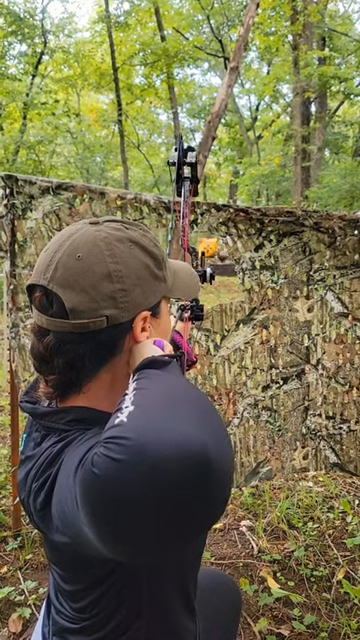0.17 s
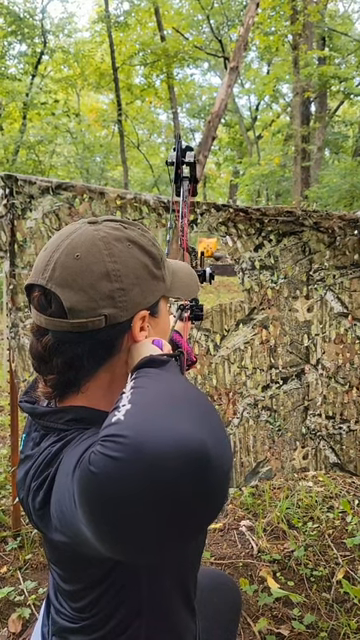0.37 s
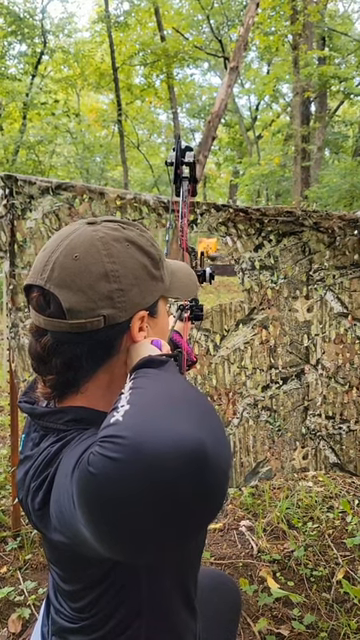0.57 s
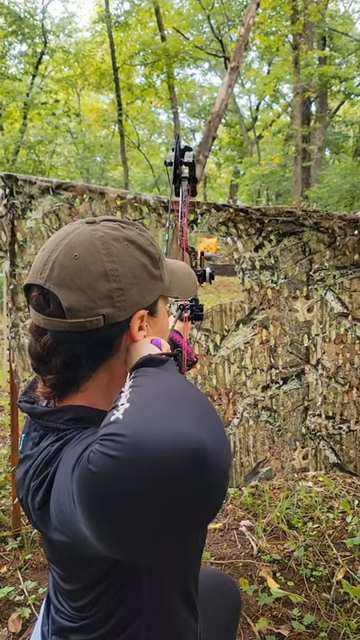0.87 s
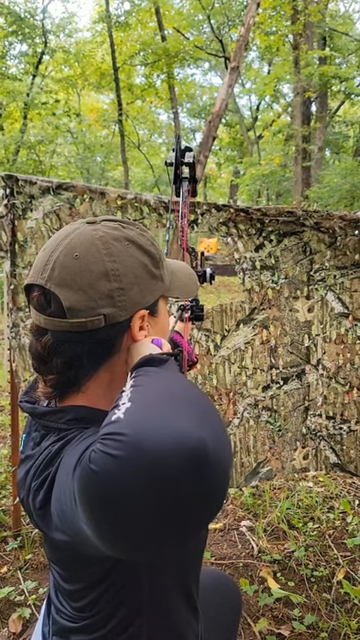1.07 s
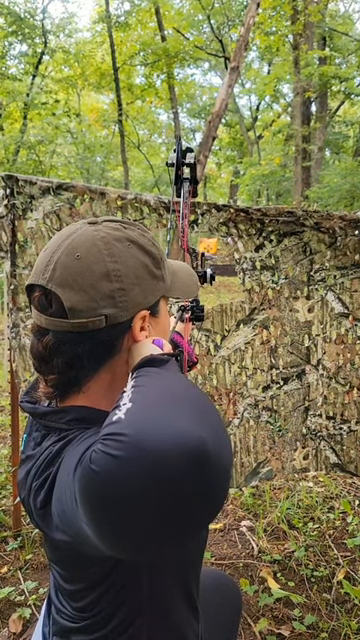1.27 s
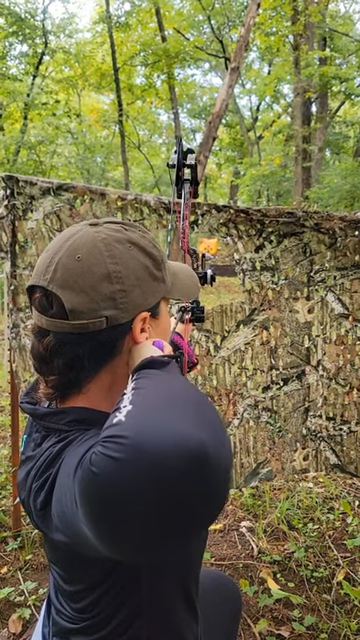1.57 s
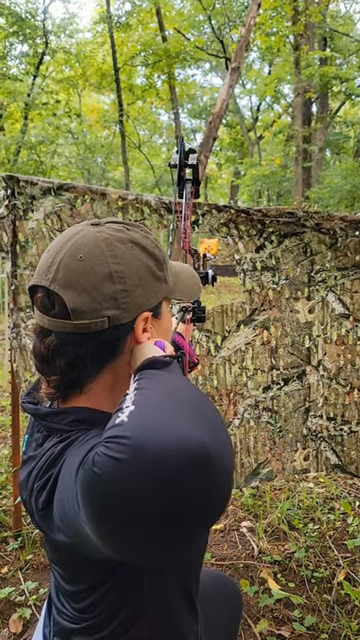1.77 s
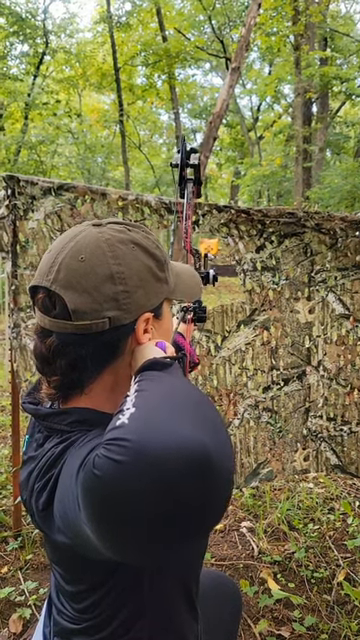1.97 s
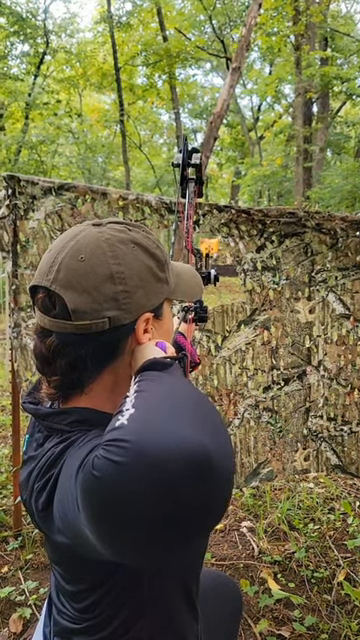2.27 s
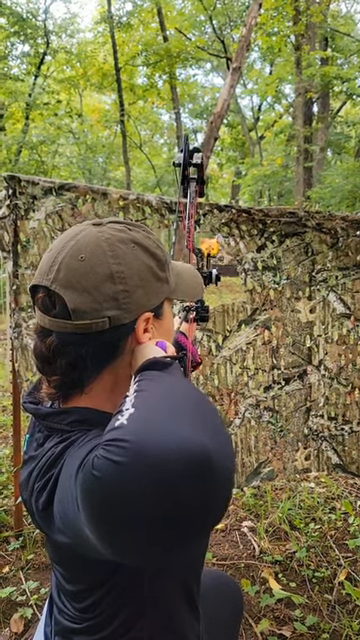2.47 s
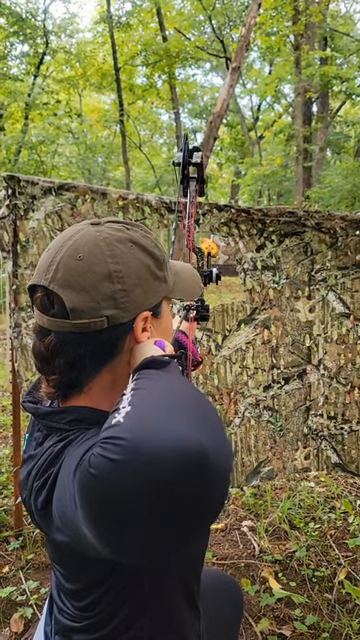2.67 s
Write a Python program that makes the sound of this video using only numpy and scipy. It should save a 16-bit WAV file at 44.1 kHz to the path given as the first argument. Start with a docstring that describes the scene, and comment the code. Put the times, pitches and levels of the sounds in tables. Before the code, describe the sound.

Crickets trill continuously for about three seconds, a dense, high, shimmering band with a nearer one pulsing very fast on the right. Beneath lie faint distant traffic, wavering low hum and light hiss. Soft road swells and hoarse far animal calls come mostly before 0.7 s, with another near 1.2. A small bird chirps faintly at 0.4, 1.8 and 2.7; twigs tick dully at 2.2 and 2.6. Soft woodland echo.

```python
"""Crickets in quiet woods

A dense chorus of crickets, modelled as patchy noise, trills around 6 kHz; nearer ones, built as trains
of gliding tones, pulse mostly on the right. Under them lie filtered-noise traffic, wavering hums and hiss.
A small bird whistles three times, animals call far off as narrow noise bands, and twigs tick twice.
Convolution with decaying random echoes gives the calls, tyre swells and separate crickets a soft tail."""
import sys
import numpy as np
from scipy import signal
from scipy.fft import rfft, irfft
from scipy.io import wavfile
from scipy.ndimage import uniform_filter1d

SR = 44100
rng = np.random.default_rng(int(sys.argv[2]) if len(sys.argv) > 2 else 0)


def master(y):
    """Save y as 16-bit WAV."""
    cut = np.clip(np.atleast_2d(y).T, -1, 1)
    pcm = np.round(cut * 32767)  # scale
    wavfile.write(sys.argv[1], SR, pcm.astype(np.int16))


N = 124803
TIME = np.arange(N) / SR  # s


def amp(db):
    """Level to amplitude: 20 dB is a factor of ten."""
    return 10 ** (np.asarray(db) / 20)


def unit(x):
    """Normalization to a root-mean-square value of 1."""
    return x / np.sqrt(np.mean(x ** 2) + 1e-20)


def pan(db):
    """Interaural level difference: gains of mean power 1, positive to the left."""
    return unit(amp([[db / 2], [-db / 2]]))


def read(points, hz):
    """Interpolation along a logarithmic frequency axis."""
    f, value = np.transpose(points)
    return np.interp(np.log(hz + 1), np.log(np.sort(f) + 1), value)


def add(mix, s, sound):
    """Superposition: the sound is summed in from time s."""
    part = mix[..., max(round(s * SR), 0):][..., :sound.shape[-1]]
    part += sound[..., :part.shape[-1]]


def progress(length):
    """Normalized time, from 0 to 1 over an event of the given length in seconds."""
    return np.arange(0, length, 1 / SR) / length


def band(hz, width_hz, size=N):
    """Gaussian band-pass filtering of white noise; around 0 Hz it gives a slow random drift."""
    f = np.fft.rfftfreq(N, 1 / SR)
    spectrum = rfft(rng.standard_normal(N)) * np.exp(-((f - hz) / width_hz) ** 2)
    return unit(irfft(spectrum, N)[:size])


def wash(spectrum, patchy_db, likeness=None, closed=False):
    """Spectral shaping of stereo noise, with level patches in time and frequency and set coherence."""
    frames, hz = N // 256 + 6, np.fft.rfftfreq(2048, 1 / SR)
    a, b, c, d, patches = rng.standard_normal((5, frames, len(hz)))
    patches = uniform_filter1d(patches, size=14, axis=0)
    patches = unit(uniform_filter1d(patches, size=18, axis=1))
    same = np.clip(read(likeness, hz), -1, 1) if likeness else 0
    left = a + 1j * b
    right = same * left + np.sqrt(1 - same ** 2) * (c + 1j * d)
    z = np.array([left, right]) * amp(read(spectrum, hz) + patchy_db * patches)
    if closed:  # nothing outside the tabulated band
        z *= (hz > spectrum[0][0]) & (hz < spectrum[-1][0])
    sound = signal.istft(z.swapaxes(1, 2), nperseg=2048, noverlap=1792)[1]
    return unit(sound[:, 512:512 + N])


WOODS_T60_S, WOODS_BUILD_S = 0.64, 0.004  # 60 dB decay time, build-up time constant


def woods(x, t60_s):
    """Multiple scattering: sparse echoes from trunks and leaves decay, independently at each ear."""
    t = TIME[:SR]
    taps = rng.standard_normal((2, SR)) * (rng.random((2, SR)) < .1)
    tail = taps * (1 - np.exp(-t / WOODS_BUILD_S)) * amp(-60 * t / t60_s)
    wet = signal.fftconvolve(x[None], tail, axes=1)
    return wet * np.linalg.norm(x) / np.linalg.norm(wet, axis=1, keepdims=True)


# microphone hiss spectrum: (frequency [Hz], relative density [dB per Hz])
HISS_SPECTRUM = [(2000, -9.5), (4000, -9), (7600, -4), (9000, 2), (11000, -0.5), (13500, 0), (16000, 3)]
HISS_DB, HISS_PAN_DB = -71.5, 6.5


def hiss():
    """Stationary random noise: the microphone's hiss, independent in the two channels."""
    return amp(HISS_DB) * pan(HISS_PAN_DB) * wash(HISS_SPECTRUM, 0)


# far machinery: (frequency [Hz], level [dB])
HUM_TONES = [(62.5, -72.5), (110, -82.5), (520, -72.5)]
HUM_WANDER_HZ, HUM_PAN_DB = 2.16, -4.5


def hums():
    """Frequency and amplitude modulation: slow random drifts waver each machine's tone."""
    total = 0
    for hz, db in HUM_TONES:
        pitch = hz + HUM_WANDER_HZ * band(0, 6.4)
        tone = np.sin(2 * np.pi * np.cumsum(pitch) / SR)
        total = total + amp(db) * unit(tone * (1 + 0.8 * band(0, 4.7)))
    return pan(HUM_PAN_DB) * total


# far traffic and air: (frequency [Hz], relative density [dB per Hz])
TRAFFIC_SPECTRUM = [(25, -33), (38, -8), (60, -1.5), (105, -2), (165, -15.5), (240, -6.5), (320, -10),
                    (480, -3.5), (620, -3.5), (790, 1.5), (900, -3.5), (1120, -4), (1500, -13), (2000, -24),
                    (2700, -35), (4000, -36.5), (6000, -60)]
# similarity of the two channels: (frequency [Hz], left-right coherence [0 to 1])
TRAFFIC_COHERENCE = [(60, 0.94), (160, .8), (450, 0.49), (740, 0.27), (1220, 0.21), (2000, 0)]
TRAFFIC_DB, TRAFFIC_PAN_DB, TRAFFIC_PATCHY_DB = -57.5, -2, 1


def traffic():
    """Partial coherence: the traffic wash is most alike at the two ears at low frequencies."""
    sound = wash(TRAFFIC_SPECTRUM, TRAFFIC_PATCHY_DB, TRAFFIC_COHERENCE)
    return amp(TRAFFIC_DB) * pan(TRAFFIC_PAN_DB) * sound


# tyre noise on the far road: (time [s], length [s], first frequency [Hz], last frequency [Hz],
# width [Hz], level [dB])
TYRE_SWELLS = [(.14, .52, 940.4, 1061, 260, -59), (.5, .85, 1175, 1606, 128, -72.5),
               (2.35, .32, 730, 850, 140, -60.5)]


def tyres(length, first_hz, last_hz, width_hz, db):
    """Noise modulation of a gliding carrier: a band of road noise swells, climbs and fades."""
    u = progress(length)
    carrier = np.cos(2 * np.pi * np.cumsum(first_hz + (last_hz - first_hz) * u) / SR)
    sound = unit(np.sin(np.pi * u) * carrier * band(0, width_hz, size=len(u)))
    return amp(db) * pan(TRAFFIC_PAN_DB) * woods(sound, WOODS_T60_S)


# hoarse animals: (time [s], length [s], pitch [Hz], width [Hz], level [dB], left-right difference [dB])
DISTANT_CALLS = [(0.5, 0.034, 3470, 120, -83, 0), (.12, 0.088, 3180, 200, -88, 5),
                 (0.35, 0.083, 930, 120, -56, -6), (0.3, 0.16, 1655, 130, -72, -4),
                 (.38, .28, 780, 40, -60, -17), (1.2, 0.11, 1900, 340, -66, -1),
                 (1.22, 0.13, 1870, 350, -72.5, -1), (1.6, 0.17, 2040, 480, -74.5, -1),
                 (2.62, 0.079, 2860, 770, -75, 2)]


def far_call(length, hz, width_hz, db, pan_db):
    """Resonance and scattering: only a hoarse call's strongest resonance and its echoes arrive."""
    u = progress(length)
    call = unit(np.sqrt(np.sin(np.pi * u)) * band(hz, width_hz, size=len(u)))
    return amp(db) * pan(pan_db) * woods(call, WOODS_T60_S)


# twigs: (time [s], frequency [Hz], noise level before the envelope [dB])
TWIG_TICKS = [(2.238, 1760, -70), (2.635, 2700, -77)]
TICK_WIDTH_HZ, TICK_DECAY_S = 440, 0.0086  # the envelope peaks at half TICK_DECAY_S


def tick(hz, db):
    """Damped impulse response: a twig's short, dull tick is narrow noise that rises and dies away."""
    t = TIME[:SR // 10]
    envelope = t / TICK_DECAY_S * np.exp(2 - 2 * t / TICK_DECAY_S)
    return amp(db) * unit(band(hz, TICK_WIDTH_HZ, size=len(t))) * envelope


# bird: (time [s], length [s], middle pitch [Hz], level of the echoes [dB], left-right difference [dB])
BIRD_CHIRPS = [(0.426, .08, 3390, -71, 5.5), (1.756, 0.067, 3396, -68.5, 0.5),
               (2.707, 0.0716, 3380, -70, 4)]
CHIRP_RISE_HZ, CHIRP_ROUGH_HZ = 200, 95
CHIRP_DIRECT_DB, CHIRP_T60_S = -8.5, 0.56  # direct sound relative to the note that feeds the echoes


def chirp(length, hz, db, pan_db):
    """Frequency modulation: a rising, slightly rough whistle, heard mostly through its echoes."""
    u = progress(length)
    pitch = hz + CHIRP_RISE_HZ * (u - .5) + CHIRP_ROUGH_HZ * band(0, 270, size=len(u))
    note = unit(np.sin(np.pi * u ** 1.53) * np.sin(2 * np.pi * np.cumsum(pitch) / SR))
    sound = woods(note, CHIRP_T60_S)
    add(sound, 0, amp(CHIRP_DIRECT_DB) * note)
    return amp(db) * pan(pan_db) * sound


# far crickets blended into one band: (frequency [Hz], relative density [dB per Hz])
CHORUS_SPECTRUM = [(4250, -53), (4530, -38), (4720, -46.5), (4930, -36), (5200, -21.5), (5500, -18.5),
                   (5800, -5.5), (6020, -2), (6170, -3.5), (6450, -9.5), (6800, -19), (6980, -25.5),
                   (7200, -30.5), (7400, -42), (7900, -44.5), (8300, -56)]
# the chorus an octave up: (frequency [Hz], relative density [dB per Hz])
OVERTONE_SPECTRUM = [(10200, -19), (11100, -12), (11700, -1), (12000, 1), (12400, -6), (13000, -6.5),
                     (13800, -21)]
CHORUS_DB, CHORUS_PAN_DB, CHORUS_PATCHY_DB = -46.5, -5.8, 0.82
OVERTONE_DB, OVERTONE_PAN_DB = -71.5, -2.5


def chorus():
    """Incoherent summation: countless far crickets merge into a noise band and its weak octave."""
    song = wash(CHORUS_SPECTRUM, CHORUS_PATCHY_DB, closed=True)
    octave = wash(OVERTONE_SPECTRUM, CHORUS_PATCHY_DB, closed=True)
    return amp(CHORUS_DB) * pan(CHORUS_PAN_DB) * song + amp(OVERTONE_DB) * pan(OVERTONE_PAN_DB) * octave


PITCH_WANDER, CRICKET_OCTAVE_DB = 0.00305, -31.5  # fraction of pitch, octave relative to fundamental


def trill(strokes, pitch, envelope, spread_db, echo_db):
    """Pulse-train modulation: wing strokes of random strength and phase, with their echoes."""
    size, start = rng.standard_normal((256, 2))[strokes.astype(int)].T
    wandering = pitch * (1 + PITCH_WANDER * band(0, 18.98))
    phase = 2 * np.pi * (np.cumsum(wandering) / SR + start)
    tone = np.sin(phase) + amp(CRICKET_OCTAVE_DB) * np.sin(2 * phase)
    song = unit(envelope * amp(spread_db * size) * tone)
    # a second of song beforehand lets the echoes already be ringing at the start
    echo = woods(np.concatenate([song[-SR:], song]), WOODS_T60_S)[:, SR:SR + N]
    return unit(song + amp(echo_db) * echo)


# crickets further off: (stroke rate [per s], pitch [Hz], fall within a stroke [Hz], stroke length [s],
# level [dB], left-right difference [dB], echo relative to direct song [dB])
FURTHER_CRICKETS = [(36.6, 6810, 210, 0.012, -67, -5.5, 6), (36.66, 7170, 180, .013, -76.5, -14, 8.5),
                    (31.56, 6050, 250, .009, -56.5, -8.5, 2.5), (33.66, 5520, 550, .012, -63.5, 6, 1)]
STROKE_SPREAD_DB, RATE_WANDER = 3.8, .008  # RATE_WANDER is a fraction of the rate


def cricket(rate, hz, fall_hz, stroke_s, db, pan_db, echo_db):
    """Stridulation: each wing stroke is a short tone that sags in pitch as the wing slows."""
    strokes = np.cumsum(rate * (1 + RATE_WANDER * band(0, 2))) / SR + rng.random()
    u = np.minimum(strokes % 1 / rate / stroke_s, 1)  # silent once it reaches 1
    song = trill(strokes, hz - fall_hz * u ** 4, np.sin(np.pi * u), STROKE_SPREAD_DB, echo_db)
    return amp(db) * pan(pan_db) * song


# one stroke, two pushes and a falling tail: (time [s], pitch [Hz], relative level [dB])
NEAR_STROKE = [(0, 5860, -36), (.003, 5770, -6), (.0055, 5745, -7), (.007, 5745, -8), (.0095, 5750, -1),
               (.0118, 5700, 0), (.014, 5580, -10), (.016, 5190, -22), (.019, 4920, -27), (.022, 4820, -50)]
NEAR_STROKES_PER_S, NEAR_FIRST_S = 33.73, -.0072
NEAR_DB, NEAR_SPREAD_DB = -52.9, 1.7
NEAR_PAN_DB, NEAR_ECHO_DB = -17, -10


def near_cricket():
    """Periodic stridulation: the nearest cricket repeats its stroke at a strictly constant rate."""
    strokes = (TIME - NEAR_FIRST_S) * NEAR_STROKES_PER_S
    age = strokes % 1 / NEAR_STROKES_PER_S
    s, hz, db = np.transpose(NEAR_STROKE)
    pitch, envelope = np.interp(age, s, hz), amp(np.interp(age, s, db))
    song = trill(strokes, pitch, envelope, NEAR_SPREAD_DB, NEAR_ECHO_DB)
    return amp(NEAR_DB) * pan(NEAR_PAN_DB) * song


def scene():
    """Linear superposition: continuous sources throughout, with timed events on top."""
    mix = hiss() + hums() + traffic() + chorus()
    for row in FURTHER_CRICKETS:
        mix += cricket(*row)
    mix += near_cricket()
    events = ((tyres, TYRE_SWELLS), (far_call, DISTANT_CALLS), (tick, TWIG_TICKS), (chirp, BIRD_CHIRPS))
    for source, table in events:
        for s, *row in table:
            add(mix, s, source(*row))
    return mix


EDGE_HZ = 15720


def record(dry):
    """Band limitation: the recorder's linear-phase low-pass removes the highest frequencies."""
    lowpass = signal.firwin(1023, EDGE_HZ, window=("kaiser", 9), fs=SR)
    return signal.oaconvolve(dry, lowpass[None], "same")


dry = scene()
out = record(dry)
master(out)
```